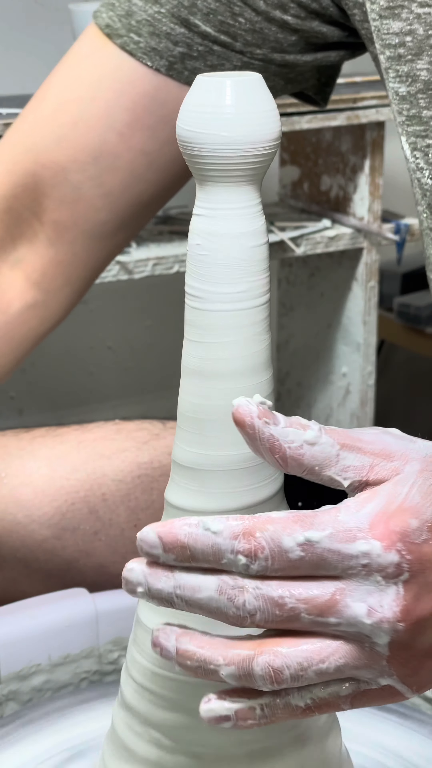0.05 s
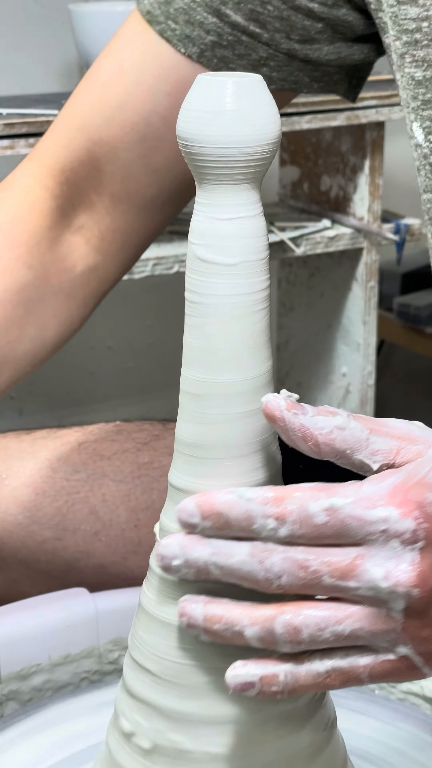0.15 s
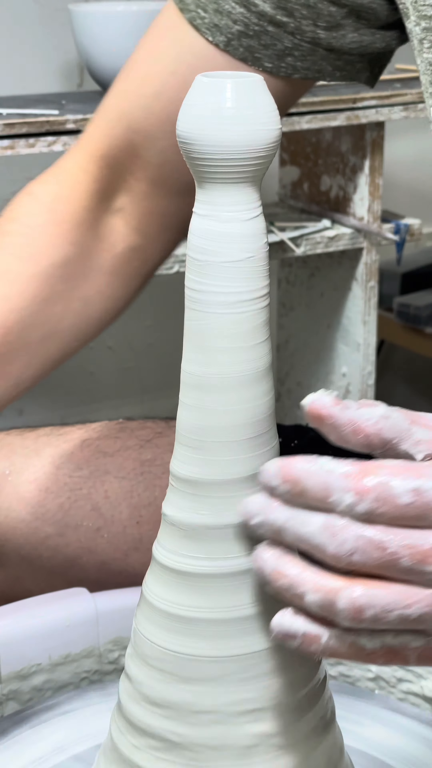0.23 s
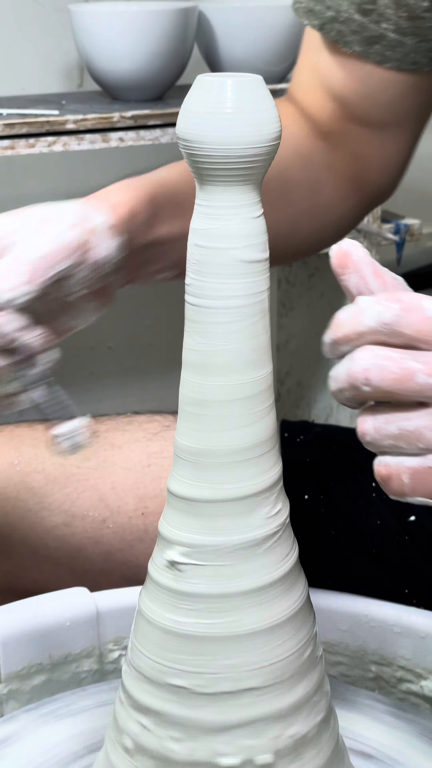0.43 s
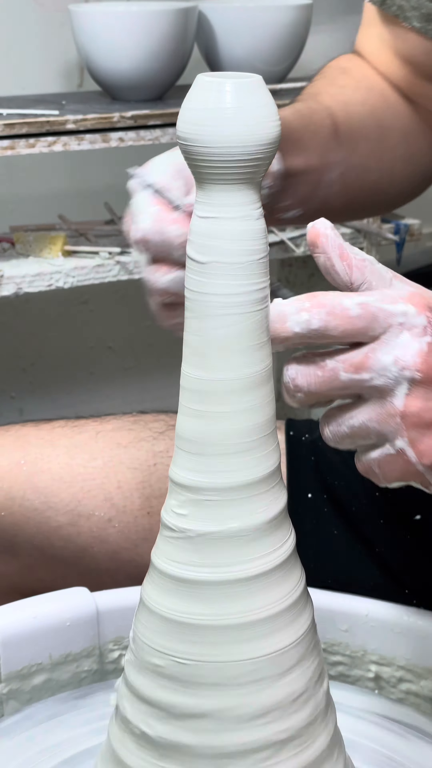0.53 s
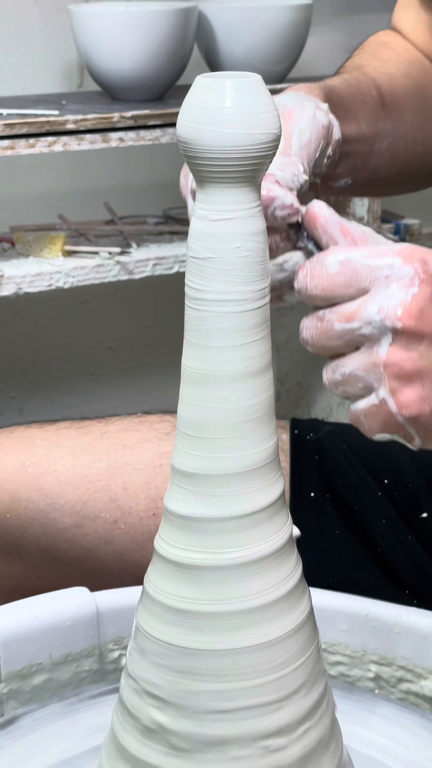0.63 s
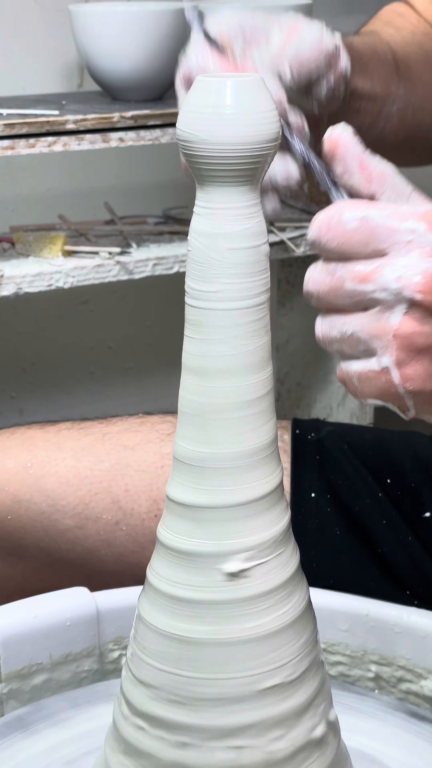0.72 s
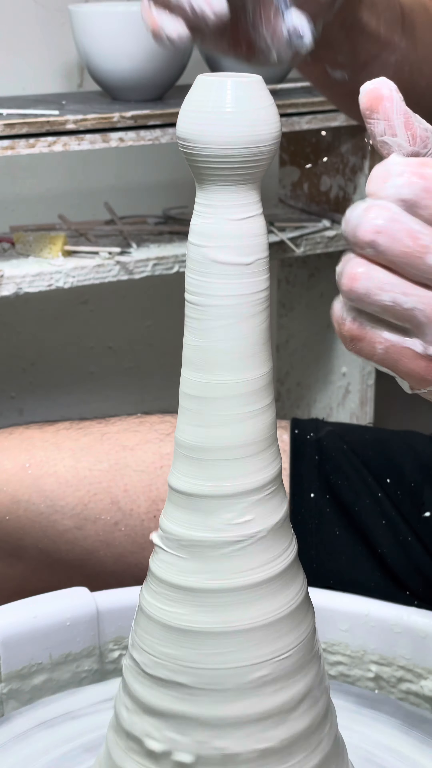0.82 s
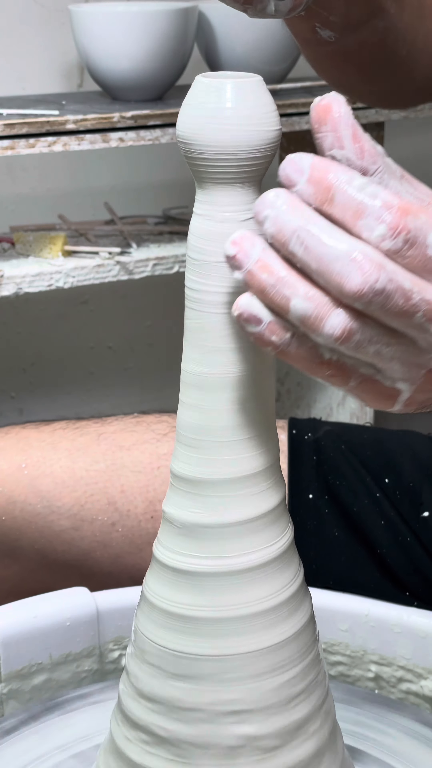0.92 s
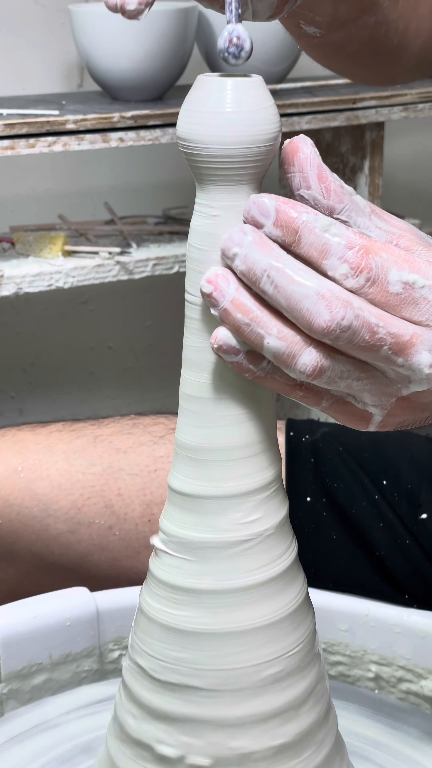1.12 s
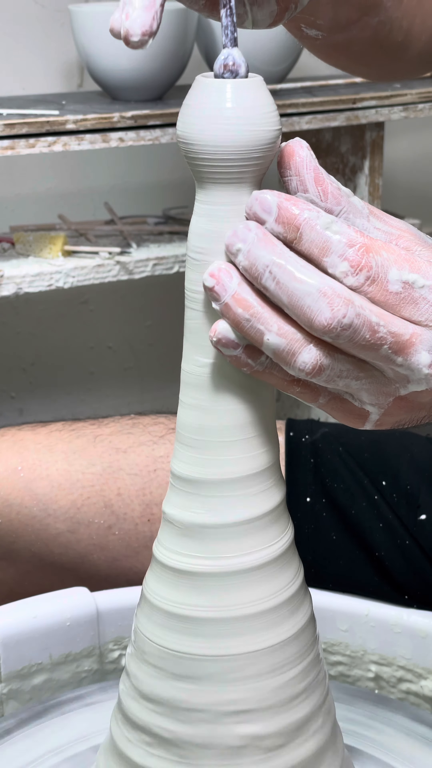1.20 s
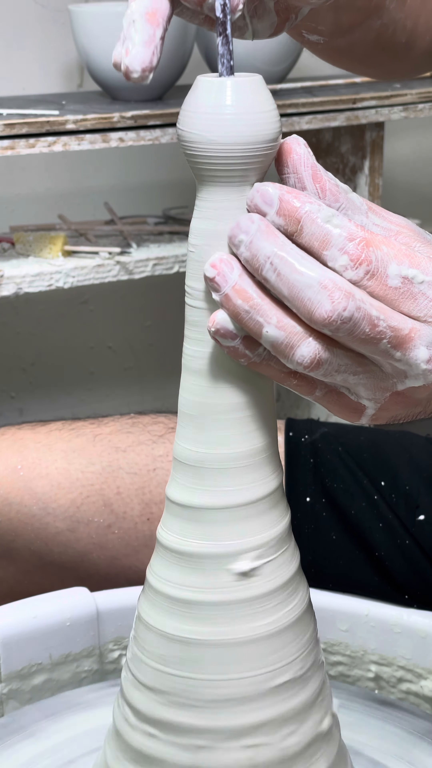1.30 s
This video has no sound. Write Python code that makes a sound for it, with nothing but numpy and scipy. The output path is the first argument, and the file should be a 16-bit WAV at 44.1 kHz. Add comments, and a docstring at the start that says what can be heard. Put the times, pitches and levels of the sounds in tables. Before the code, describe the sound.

One sharp tool clack on a bench, with soft rustling and a quiet pottery wheel hum.

```python
"""A potter's wheel hums in a small studio. A wet hand slips off the clay and a sleeve rustles as the
arm reaches for a tool. The tool taps lightly, then slaps once on the bench at 0.21 s: the bench rings,
shelves scatter the crack, the room answers briefly. The tool drags off the bench, catches a few times
and taps once more. From 1.2 s, wet fingers on the turning clay make tiny ticks."""
import sys
import numpy as np
from scipy import signal
from scipy.fft import rfft, irfft
from scipy.io import wavfile
from scipy.ndimage import uniform_filter1d

SR = 44100
rng = np.random.default_rng(int(sys.argv[2]) if len(sys.argv) > 2 else 0)


def store_wav(level_fs):
    """Save 16-bit WAV to argv[1]."""
    pcm = np.round(np.clip(np.atleast_2d(level_fs), -1, 1) * 32767)
    wavfile.write(sys.argv[1], SR, pcm.T.astype(np.int16))


N = 59535

# Motor tones. Each row: full-speed frequency in Hz, width in Hz, relative level in dB.
MOTOR_TONES = [(240.5, 14, -76), (424, 44, -66.5), (554.6, 42, -79.5), (697, 24, -80.5), (1154, 25, -91)]
# Motor speed. Each row: time in seconds, share of full speed.
MOTOR_SPEED = [(0, 0.95), (0.399, 0.99), (0.699, 1), (0.899, .97), (1.07, .95), (1.15, 1.0), (1.35, 0.96)]

# Envelopes. Each row: time in seconds, gain in dB.
MOTOR_ENV_DB = [(0, 2.5), (0.15, 1), (0.45, -1), (0.7, -0.5), (0.82, -4.5), (0.9, -4), (1.08, 2),
                (1.23, 2.5), (1.35, 0)]
DRONE_ENV_DB = [(0, -69), (0.1, -63), (0.3, -63.5), (0.42, -65), (0.5, -78), (0.57, -59.5), (0.72, -66.5),
                (0.76, -68.5), (0.82, -67), (1.08, -59), (1.16, -69.5), (1.35, -75.5)]
HAND_ENV_DB = [(0, -61), (0.035, -61), (0.06, -67), (0.1, -74.5), (0.15, -67.5), (0.2, -84)]
SLEEVE_ENV_DB = [(0, -74.5), (0.06, -74), (0.13, -64.5), (0.2, -63), (0.27, -72.5), (0.33, -75.5),
                 (0.39, -76.5), (0.45, -78), (0.51, -81), (0.59, -79.5), (0.68, -72.5), (0.78, -69.5),
                 (0.86, -68), (0.91, -71), (0.97, -91), (1.35, -90.5)]
BRUSH_ENV_DB = [(0, -99), (0.24, -63), (0.33, -87), (0.39, -91), (0.45, -70.5), (0.51, -72), (0.59, -88),
                (0.78, -76.5), (0.9, -85), (1.0, -95.5)]
DRAG_ENV_DB = [(0.5, -81.5), (0.55, -63), (0.6, -64.5), (0.65, -61.5), (0.69, -83), (0.72, -67),
               (0.78, -100)]

# Spectra. Each row: frequency in Hz, relative level in dB.
BACKGROUND_EQ_DB = [(20, -18.5), (42, 5), (75, 6.5), (130, -0.5), (300, -1), (480, -5.5), (700, -12),
                    (1000, -24), (1600, -32), (4000, -35.5), (8000, -44), (11500, -29), (12500, -33),
                    (13500, -47), (16000, -57.5)]
HAND_EQ_DB = [(60, -1), (280, 1.5), (500, -0.5), (800, -8), (1300, -18), (1700, -8.5), (2100, -7.5),
              (2600, -34.5), (7000, -20), (14000, -38)]
SLEEVE_EQ_DB = [(200, -16.5), (1000, -19), (2500, -4), (4200, -0.5), (5500, 1.5), (8000, 0.5), (11500, 5),
                (12800, 5), (14000, -16), (16000, -27.5)]
BRUSH_EQ_DB = [(1000, -41), (5000, -25), (8500, -3), (11500, 6), (12800, 1.5), (14000, -14.5), (16000, -30)]
CRACK_EQ_DB = [(100, -47.5), (550, -38.5), (800, -13), (1250, -11.5), (2100, -7.5), (3000, 5.5),
               (4200, -9.5), (7000, -13), (9000, -15), (12000, -9), (14000, -21), (16000, -40)]
SHELF_EQ_DB = [(100, -52), (600, -18.5), (1250, 0), (2100, -1), (3000, -4), (4200, -14), (7000, -16),
               (9000, -18), (12000, -19.5), (14000, -37), (16000, -44.5)]
SPILL_EQ_DB = [(100, -16.5), (300, -15), (700, -5), (1000, -1.5), (1250, 9), (1500, 0), (2300, 2),
               (3200, -2), (4300, -11), (7000, -16), (9000, -32), (12000, -13.5), (14000, -36),
               (16000, -48.5)]  # slap radiated into the room
DRAG_EQ_DB = [(100, -5), (500, 3.5), (1200, -1.5), (1800, -9.5), (3200, -12), (4000, -34), (12000, -36)]
CATCH_EQ_DB = [(100, -8), (450, 13), (1000, 7), (2000, 2.5), (3100, 5), (4000, -11.5), (7000, -12),
               (14000, -51)]
ROOM_EQ_DB = [(80, -2.5), (250, 4), (600, 3), (1300, -5), (2200, -1.5), (3200, -3.5), (6000, 3),
              (12000, -15.5)]
SIDE_EQ_DB = [(60, -16.5), (300, -11.5), (550, -6), (800, -2.5), (1250, -3.5), (2000, -15.5), (3500, -17.5),
              (6000, -14.5), (14000, -15)]  # side share of diffuse sound
MIC_BALANCE_DB = [(60, 1), (400, 1), (700, -2.5), (1250, 1.5), (2300, 0), (15000, 0)]  # left over right
MIC_ROLLOFF_DB = [(12500, -0.5), (14000, -5.5), (16000, -7.5)]

# Tool taps, wet ticks. Each row: start in seconds, level in dB, ring or bubble pitch in Hz, T60 in seconds.
TOOL_TAPS = [(0.0235, -56, 2020, 0.079), (0.110, -50.5, 1080, 0.014), (0.120, -53.5, 1100, 0.034),
             (0.794, -63, 2650, 0.012)]
WET_TICKS = [(1.1985, -58, 12000, 0.012), (1.2552, -71.5, 4491, 0.03), (1.2553, -64, 7390, 0.036),
             (1.256, -78.5, 1880, 0.07), (1.2585, -61.5, 11950, 0.03)]
# Contacts within the slap. Each row: delay in seconds, relative level in dB, low-pass corner in Hz.
SLAP_CONTACTS = [(0.0, -7.5, 14000), (0.0003, -1, 12050), (0.001, -6, 6275), (0.0031, -5, 2200),
                 (0.0043, -15, 2657)]
# Tool and bench ring, low bench thump. Each row: frequency in Hz, relative level in dB, T60 in seconds.
RING_MODES = [(733, -25, .04), (859, -16.5, .05), (996, -14, 0.087), (1185, -8, 0.075), (1342, -2.5, 0.053),
              (1634, -8, 0.06), (1915, -10.5, 0.069), (2446, -6.5, .035), (2865, -9, .03), (3224, -1, .02),
              (3204, -2, .028), (3733, -7, .035), (4800, -6.5, 0.016)]
THUMP_MODES = [(95, -49.5, .22), (181, -45.5, 0.092), (278, -43.5, 0.045), (400, -28, 0.02),
               (494.7, -30.5, 0.033)]
# Catches of the dragged tool. Each row: start in seconds, level in dB, T60 in seconds.
DRAG_CATCHES = [(0.354, -53.5, 0.048), (0.660, -51.5, 0.036), (0.6633, -51, 0.079), (0.674, -54, 0.091),
                (0.6963, -52.5, 0.027), (0.7315, -51.5, 0.037)]
# Studio decay. Each row: frequency in Hz, T60 in seconds.
ROOM_T60_S = [(100, 0.38), (500, 0.28), (1400, 0.3144), (3000, 0.3271), (6000, 0.21), (12000, 0.5)]
# Microphone phase. Each row: frequency in Hz, lead of the left in radians.
MIC_PHASE_RAD = [(20, 0), (1000, -.2), (1700, -.3), (3000, .4), (5200, .4), (5750, -1.4), (6800, -.8),
                 (8900, -3.14), (11000, -4.6), (13500, -6.2)]


def amp(db):
    """Decibels to gain."""
    return 10 ** (np.asarray(db) / 20)


def unit_rms(x):
    """Scale to rms 1."""
    return x / np.sqrt(np.mean(x ** 2) + 1e-20)


def at_hz(points, hz):
    """Interpolate on a log-frequency axis."""
    knots_hz, values = np.transpose(points)
    return np.interp(np.log(hz + 1), np.log(knots_hz + 1), values)


def curve(points):
    """Interpolate in time, one value per sample."""
    return np.interp(np.arange(N) / SR, *np.transpose(points))


def decay(t, t60_s):
    """Fall of 60 dB per t60_s."""
    return np.exp(-np.log(1000) * t / t60_s)


def add(mix, start_s, sound):
    """Mix in place."""
    part = mix[max(round(start_s * SR), 0):][:len(sound)]
    part += sound[:len(part)]


def colour(x, eq_db, size=4096):
    """Minimum-phase filter."""
    log_gain = np.log(amp(at_hz(eq_db, abs(np.fft.fftfreq(size, 1 / SR)))))
    response = np.exp(np.conj(signal.hilbert(log_gain)))
    impulse = np.fft.ifft(response).real[:size // 2]
    return signal.fftconvolve(x, impulse)[:len(x)]


def noise(count, eq_db):
    """Coloured noise, rms 1."""
    return unit_rms(colour(rng.standard_normal(count), eq_db))


def friction(env_db, eq_db, slips_per_s, spread_db):
    """Random train of tiny, uneven slips."""
    sizes = amp(spread_db * np.minimum(rng.exponential(1, N), 4))
    slips = sizes * rng.choice([-1, 1], N) * (rng.random(N) < slips_per_s / SR)
    return amp(curve(env_db)) * unit_rms(colour(slips, eq_db))


def fuzzy_tone(hz, width_hz):
    """Tone wavering in strength and phase, rms 1."""
    offset_hz = np.fft.fftfreq(N, 1 / SR)
    white = rng.standard_normal(N) + 1j * rng.standard_normal(N)
    waver = np.fft.ifft(np.fft.fft(white) / (1 + (2 * offset_hz / width_hz) ** 2))
    carrier = np.exp(2j * np.pi * np.cumsum(hz * np.ones(N)) / SR)
    return unit_rms((waver * carrier).real)


def wheel_motor():
    """Motor tones follow the speed, over steady noise and a thin high hiss."""
    speed = curve(MOTOR_SPEED)
    tones = sum(amp(db) * fuzzy_tone(hz * speed, width_hz) for hz, width_hz, db in MOTOR_TONES)
    background = amp(-63.5) * noise(N, BACKGROUND_EQ_DB)
    hiss = amp(-80) * fuzzy_tone(hz=12000, width_hz=400)
    return amp(curve(MOTOR_ENV_DB)) * tones + background + hiss


def wheel_drone(centre_hz=59.5, wander_hz=8.3, smooth_s=0.035):
    """The wheel's low hum wanders in pitch and fades near the end."""
    wander = unit_rms(uniform_filter1d(rng.standard_normal(N), round(smooth_s * SR)))
    phase_rad = 2 * np.pi * np.cumsum(centre_hz + wander_hz * wander) / SR
    return amp(curve(DRONE_ENV_DB)) * unit_rms(np.sin(phase_rad))


def wet_hand():
    """The hand slips off the turning clay."""
    return friction(HAND_ENV_DB, HAND_EQ_DB, slips_per_s=4500, spread_db=2)


def sleeve():
    """Dense fibre slips swell as the arm goes out and back, with a brighter brush between."""
    return sum(friction(env_db, eq_db, slips_per_s=42000, spread_db=4.5)
               for env_db, eq_db in [(SLEEVE_ENV_DB, SLEEVE_EQ_DB), (BRUSH_ENV_DB, BRUSH_EQ_DB)])


def studio(x, delay_s=0.0021, rise_s=0.006):
    """Short diffuse tail; each band dies at its own rate."""
    hz, t, bands = signal.stft(rng.standard_normal(SR // 2), SR, nperseg=256)
    tail = signal.istft(bands * decay(t, at_hz(ROOM_T60_S, hz)[:, None]), SR, nperseg=256)[1]
    tail *= np.clip((np.arange(len(tail)) / SR - delay_s) / rise_s, 0, 1)
    impulse = colour(tail / np.linalg.norm(tail), ROOM_EQ_DB)
    return amp(-7) * signal.fftconvolve(x, impulse)[:len(x)]


def stereo(mid, side):
    """Diffuse sound at the two microphones."""
    side = colour(side, SIDE_EQ_DB)
    return np.array([mid + side, mid - side])


def pings(rows, fizz_gain):
    """Tool taps or wet ticks: each contact rings briefly, with noise around its pitch."""
    t, out = np.arange(SR // 8) / SR, np.zeros(N)
    for start_s, db, hz, t60_s in rows:
        fizz = noise(len(t), [(hz / 8, -24), (hz / 2, -7), (hz, 0), (hz * 2, -12), (hz * 4, -26)])
        add(out, start_s, amp(db) * decay(t, t60_s) * (np.sin(2 * np.pi * hz * t) + fizz_gain * fizz))
    return out


def bench_ring(modes, t):
    """Damped modes of alternating sign."""
    return sum((-1) ** k * amp(db) * decay(t, t60_s) * np.sin(2 * np.pi * hz * t)
               for k, (hz, db, t60_s) in enumerate(modes))


def tool_slap(start_s=0.21414, thump_rise_s=0.0051):
    """Quick contacts crack; the bench rings and thumps, shelves scatter, the room answers."""
    t = np.arange(SR // 2) / SR
    click, crack, out = 1. * (t == 0), np.zeros(len(t)), np.zeros((2, N))
    contact = amp(6.5) * colour(click, CRACK_EQ_DB)
    for delay_s, db, corner_hz in SLAP_CONTACTS:
        pole = np.exp(-2 * np.pi * corner_hz / SR)
        add(crack, delay_s, amp(db) * signal.lfilter([1 - pole], [1, -pole], contact))
    ring = amp(-22) * bench_ring(RING_MODES, t)
    thump = np.minimum(t / thump_rise_s, 1) * bench_ring(THUMP_MODES, t)
    scatter = rng.choice([-1, 1], (2, len(t))) * decay(t, t60_s=0.044)
    spill = amp(12) * colour(click, SPILL_EQ_DB)
    mid, side = [amp(9.5) * colour(x / np.linalg.norm(x), SHELF_EQ_DB) + studio(spill) for x in scatter]
    for channel, sound in zip(out, crack + ring + thump + stereo(mid, side)):
        add(channel, start_s, sound)
    return out


def tool_drag():
    """The tool slides over the gritty bench and catches a few times."""
    t = np.arange(SR // 8) / SR
    out = friction(DRAG_ENV_DB, DRAG_EQ_DB, slips_per_s=1500, spread_db=1)
    for start_s, db, t60_s in DRAG_CATCHES:
        add(out, start_s, amp(db) * decay(t, t60_s) * noise(len(t), CATCH_EQ_DB))
    return out


def scene():
    """Handling sounds in the studio, over the wheel."""
    taps = pings(TOOL_TAPS, fizz_gain=0.21)
    ticks = pings(WET_TICKS, fizz_gain=0.75)
    handling = taps + ticks + tool_drag() + sleeve() + wet_hand()
    foreground = tool_slap() + handling + wheel_drone()
    mid, side = [studio(handling) + wheel_motor() for _ in range(2)]
    return foreground + stereo(mid, side)


def record(dry, cutoff_hz=16500):
    """Microphone pair, unequal in phase and level; treble roll-off and band limit."""
    hz = np.fft.rfftfreq(2 * N, 1 / SR)
    left = amp(at_hz(MIC_BALANCE_DB, hz) / 2)
    right = np.exp(-1j * at_hz(MIC_PHASE_RAD, hz)) / left
    response = np.array([left, right]) * amp(at_hz(MIC_ROLLOFF_DB, hz))
    heard = irfft(rfft(dry, 2 * N) * response)[:, :N]
    lowpass = signal.firwin(511, cutoff_hz, window=("kaiser", 9), fs=SR)
    return signal.oaconvolve(heard, lowpass[None], "same")


dry = scene()
out = record(dry)
store_wav(out)
```